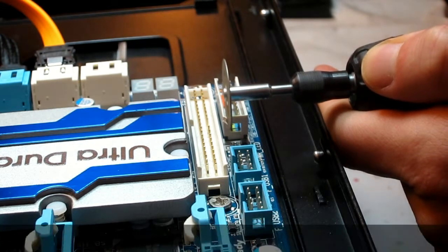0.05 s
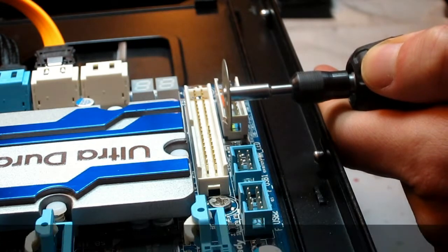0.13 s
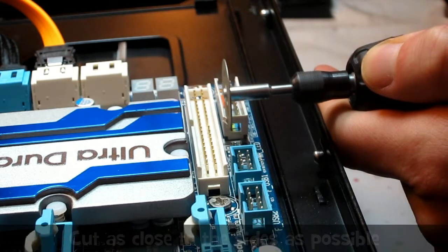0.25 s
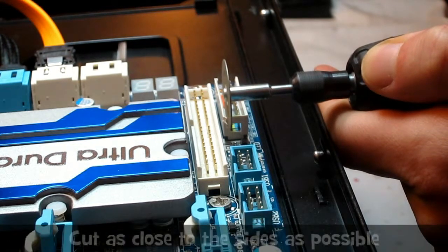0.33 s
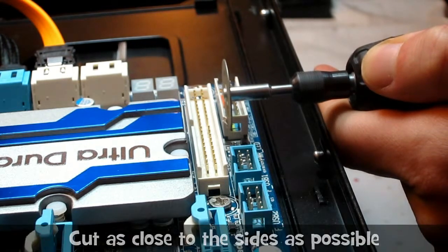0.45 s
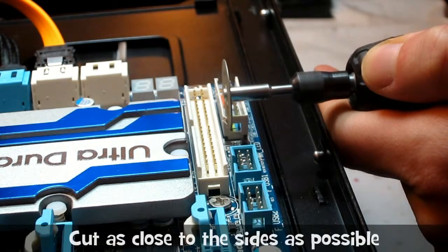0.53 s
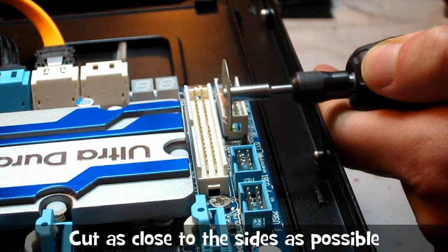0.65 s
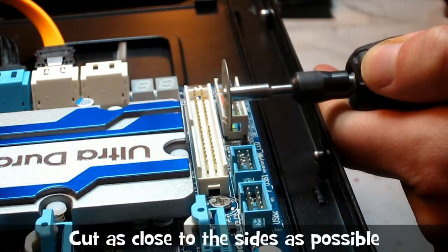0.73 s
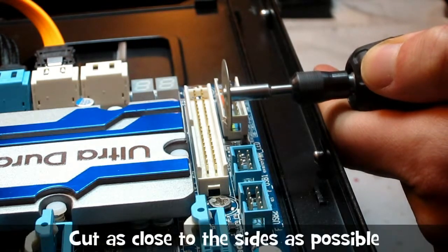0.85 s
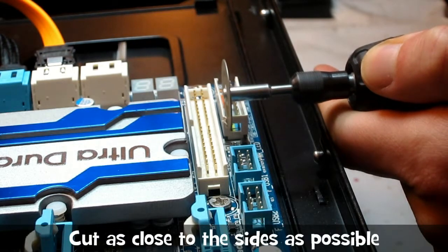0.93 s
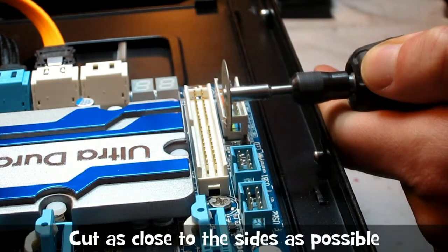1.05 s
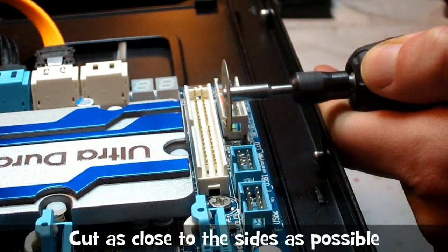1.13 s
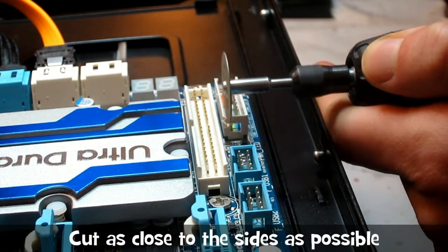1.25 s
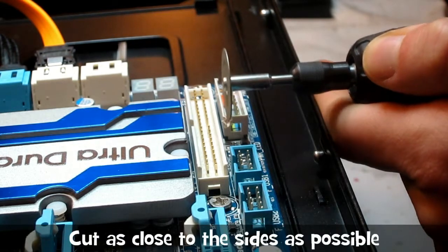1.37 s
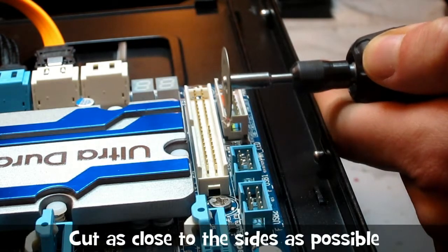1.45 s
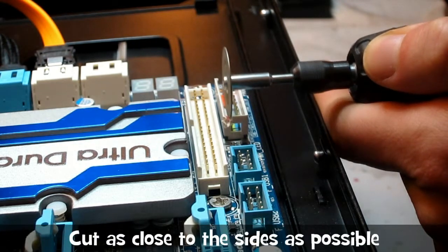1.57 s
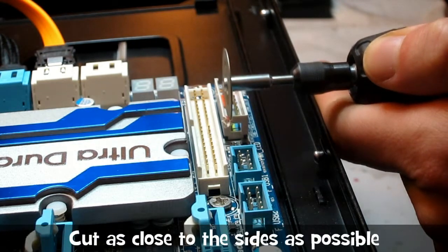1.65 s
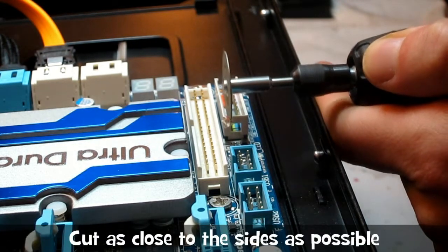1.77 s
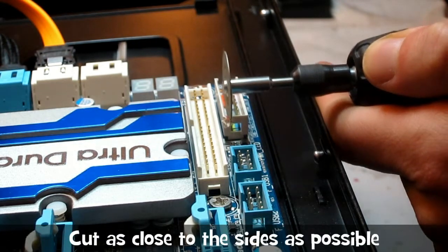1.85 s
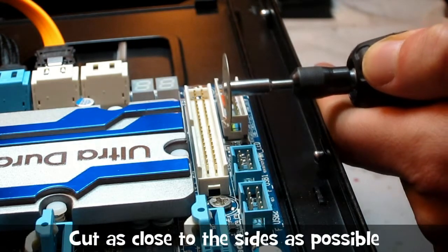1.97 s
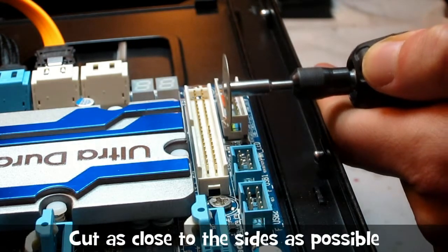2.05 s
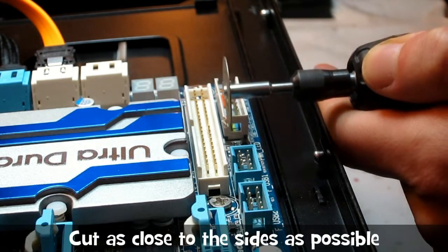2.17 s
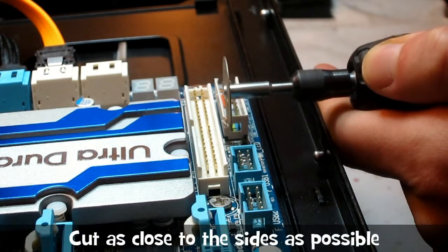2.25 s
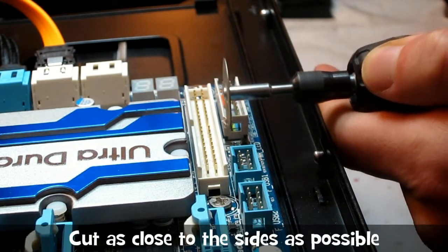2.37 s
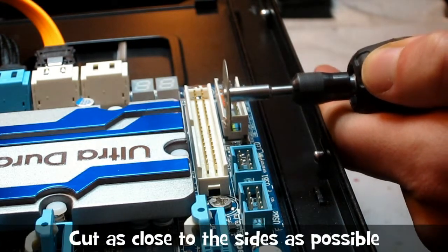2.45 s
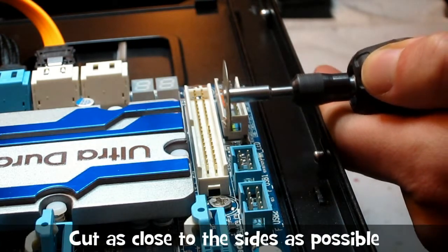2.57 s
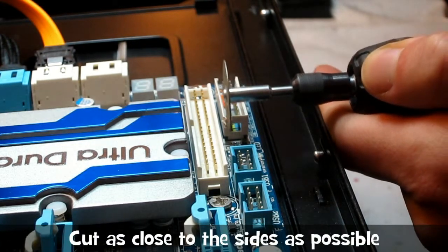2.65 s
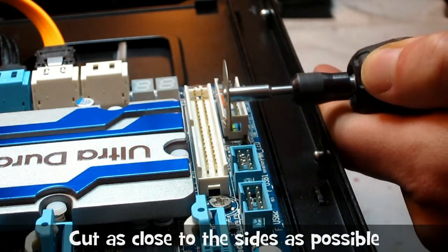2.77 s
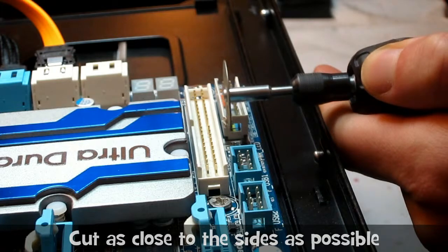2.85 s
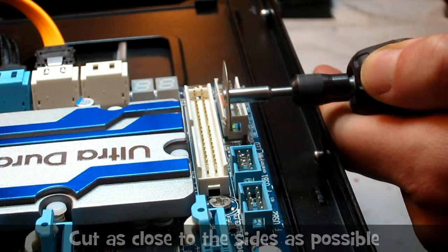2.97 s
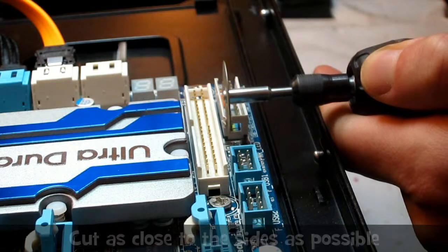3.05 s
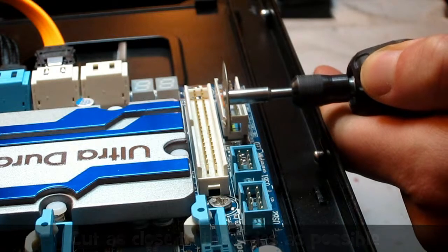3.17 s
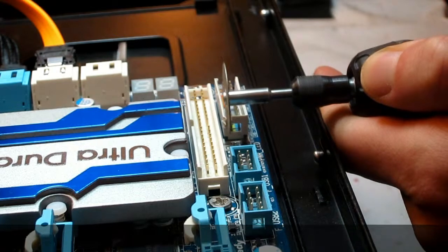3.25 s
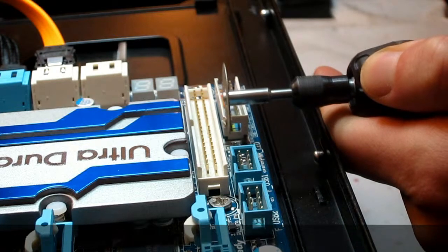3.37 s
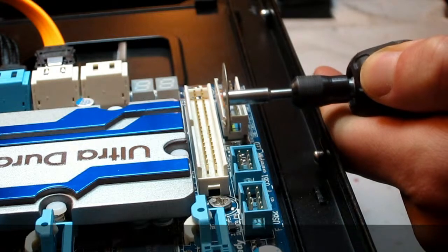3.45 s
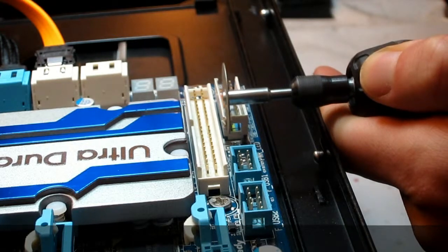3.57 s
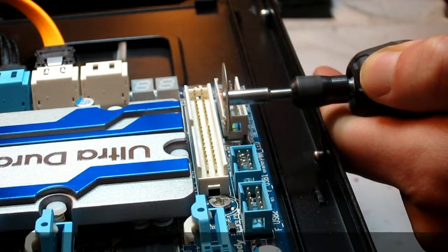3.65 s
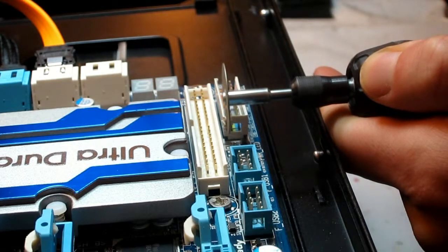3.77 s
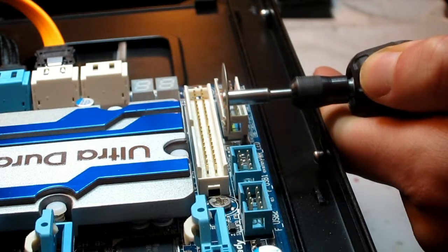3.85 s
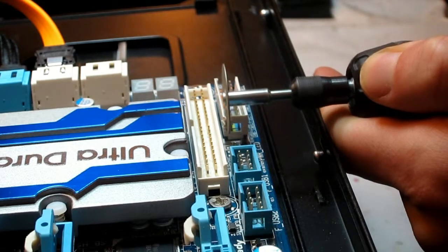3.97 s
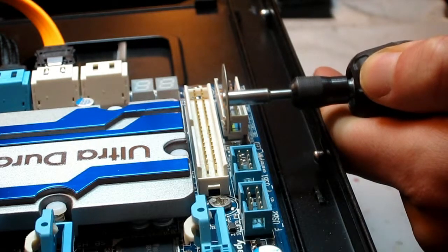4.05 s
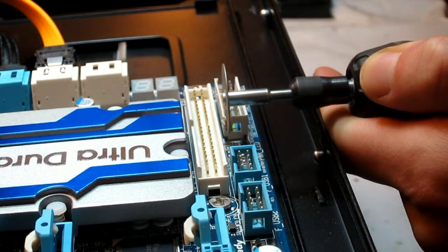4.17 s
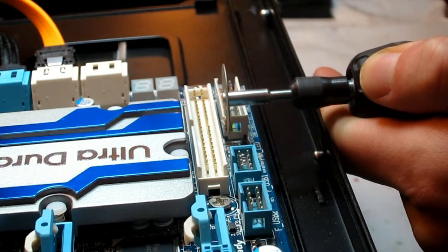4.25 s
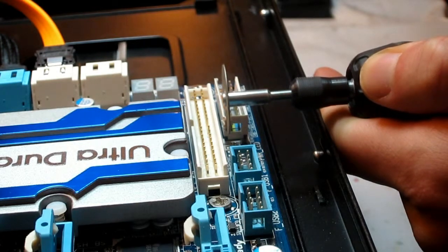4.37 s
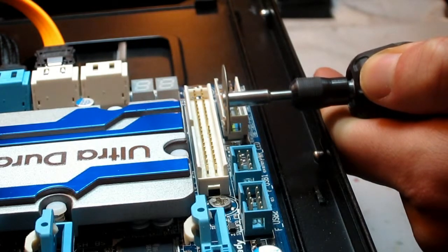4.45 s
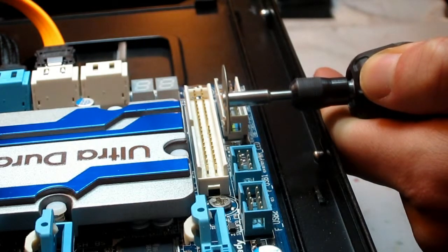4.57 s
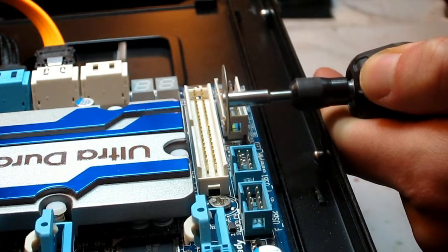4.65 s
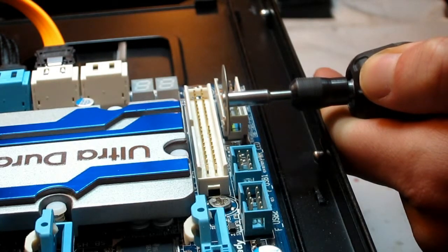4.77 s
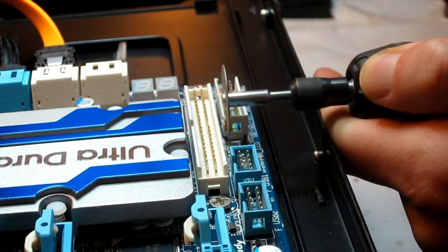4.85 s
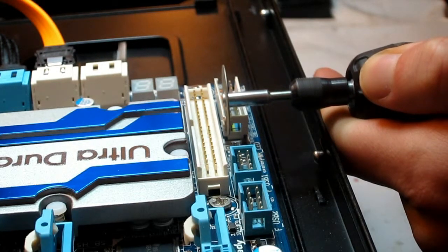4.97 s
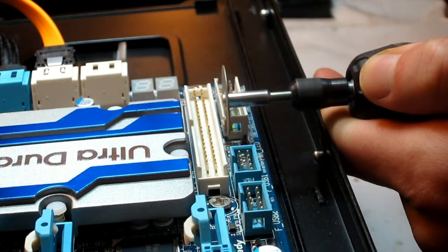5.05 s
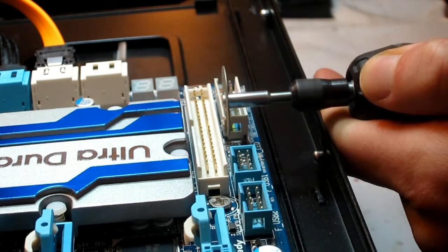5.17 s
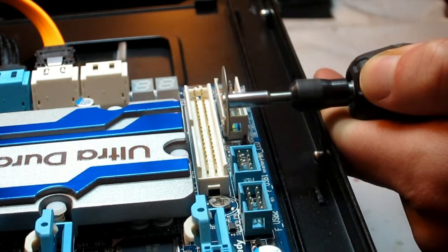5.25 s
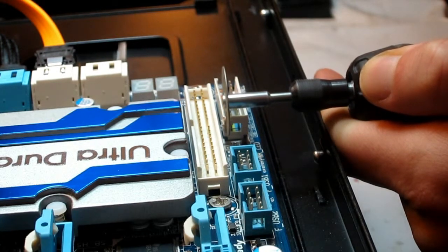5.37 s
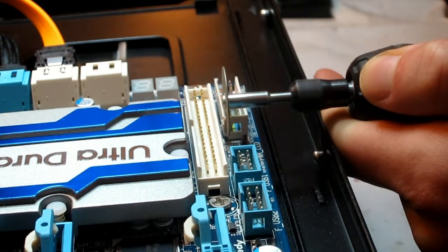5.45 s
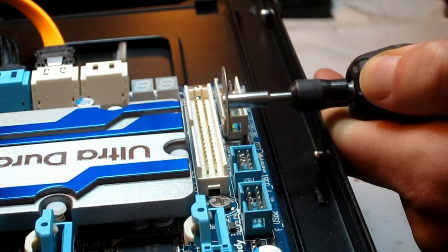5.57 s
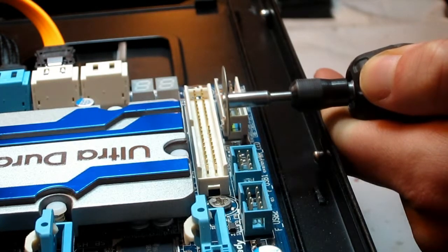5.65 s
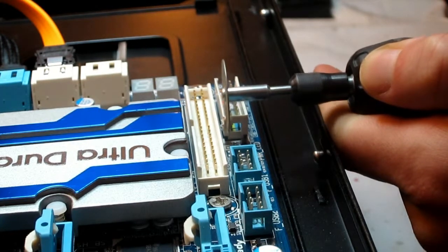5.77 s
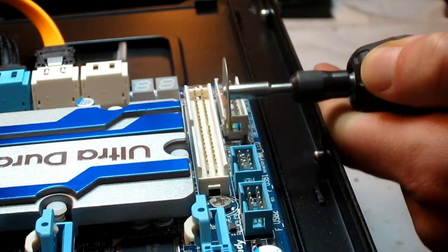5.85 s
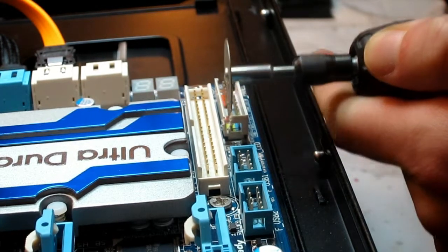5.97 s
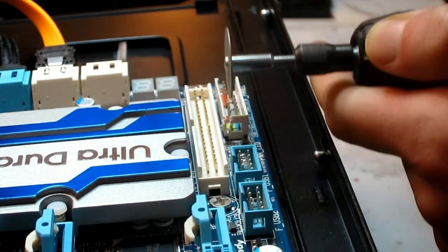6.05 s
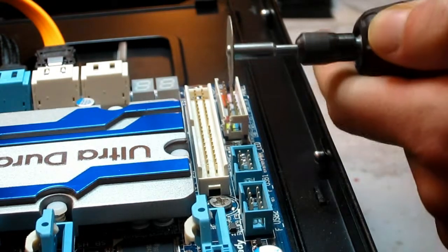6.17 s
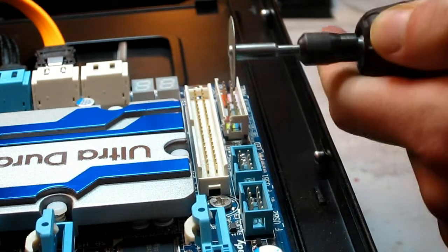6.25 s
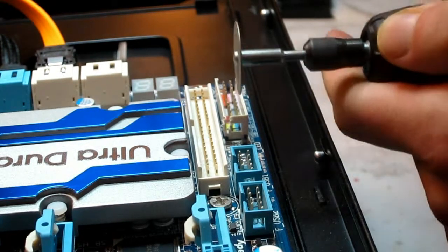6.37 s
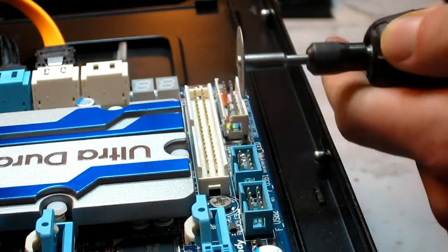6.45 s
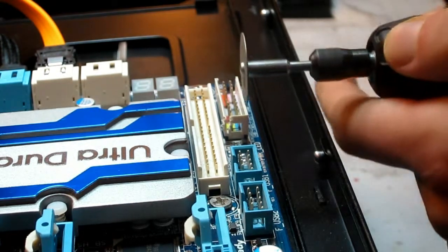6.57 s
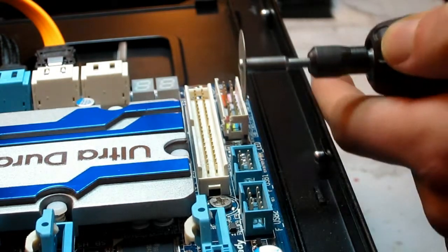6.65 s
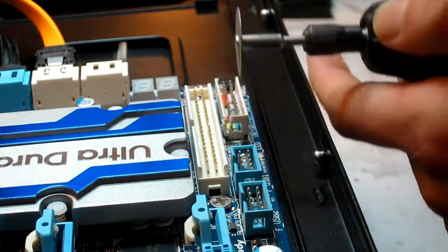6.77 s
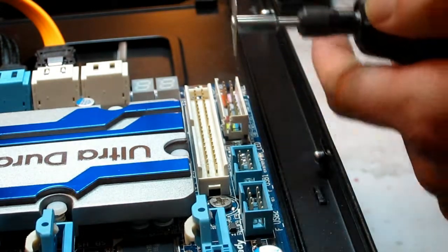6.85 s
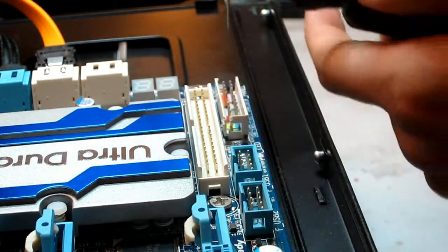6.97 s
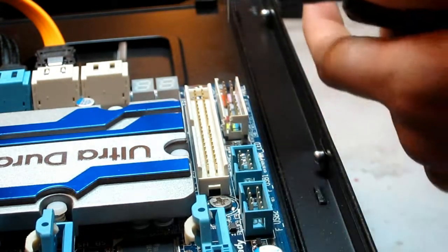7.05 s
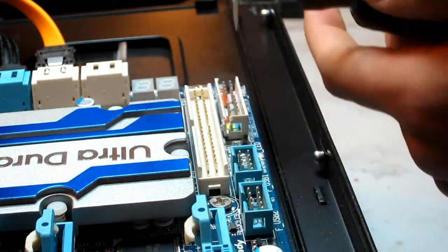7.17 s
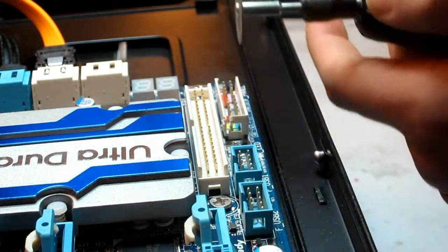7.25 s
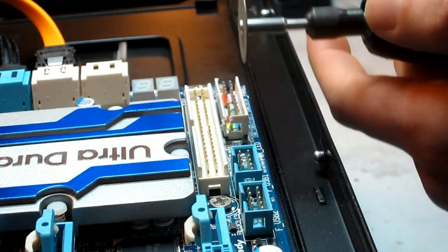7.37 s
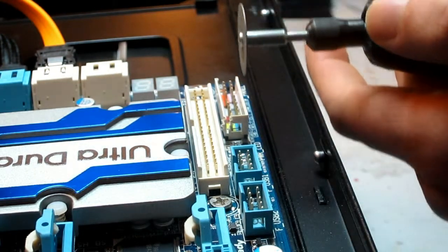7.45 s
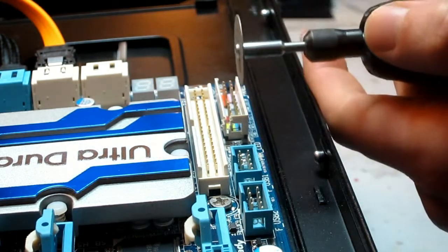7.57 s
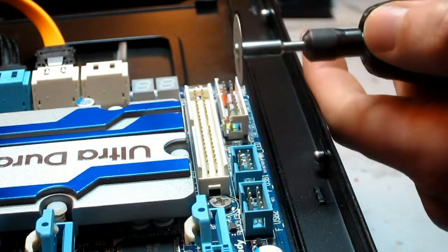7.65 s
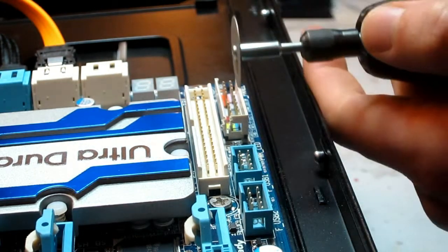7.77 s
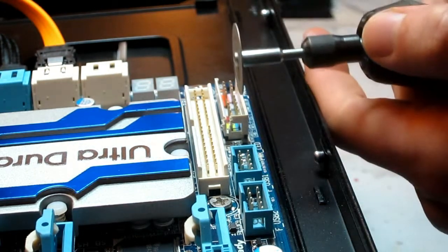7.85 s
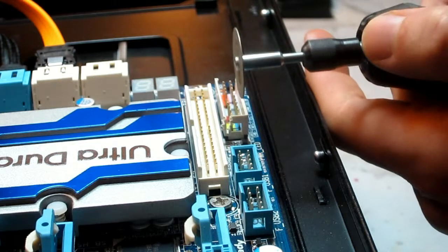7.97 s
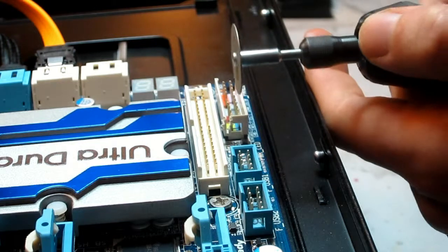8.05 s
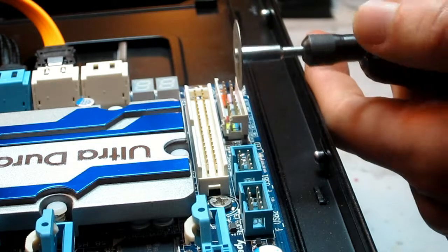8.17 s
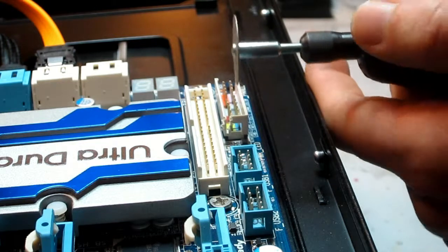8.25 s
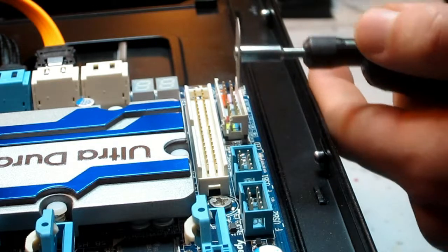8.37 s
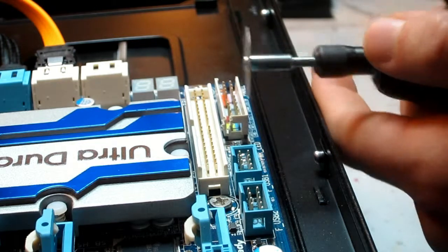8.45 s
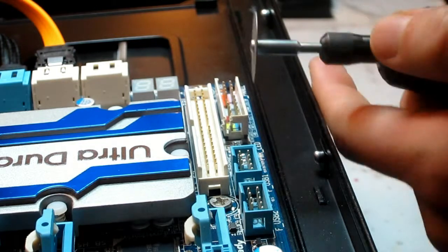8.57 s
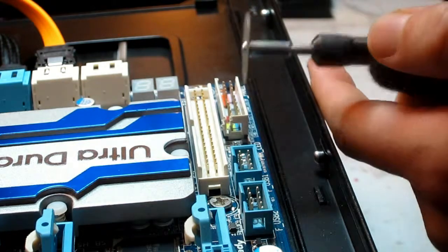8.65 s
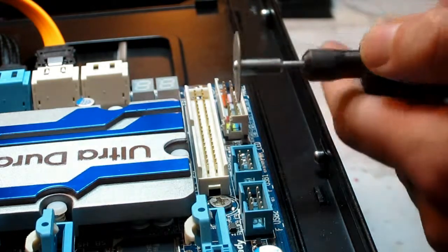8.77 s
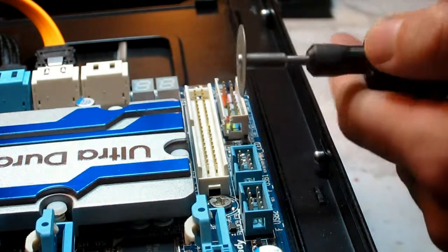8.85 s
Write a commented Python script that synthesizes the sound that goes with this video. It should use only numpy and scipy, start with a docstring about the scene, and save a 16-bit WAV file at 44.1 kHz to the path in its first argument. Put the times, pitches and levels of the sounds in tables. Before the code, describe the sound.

A handheld rotary tool is heard close up in a small, quiet room. It starts mid-cut, its thin disc grinding into a plastic connector with a shrill, gritty rasp, wavering squeal and fine hiss, while the circuit board buzzes underneath. At 1.3 seconds the disc lifts and the motor rises to a high whine with a fast ticking whirr. A few light scrapes come between 2 and 2.5 seconds. From 2.6 to 5.9 seconds a longer cut drags the motor down, its pitch wobbling under loud, pulsing grinding and squealing. After one last brief graze, the motor runs back up and spins freely, quieter than the cutting, with a steady whine, airy hiss and a thin whistle. Around 8 seconds a low rumble swells like air buffeting the microphone, peaking in a short hum at 8.4 seconds. The hiss briefly brightens and the tool keeps running until about 9 seconds.

```python
"""A handheld rotary tool with a thin cutting disc grinds into a plastic connector on a circuit board.
It opens mid-cut: the slightly eccentric disc bites once a turn, grit rings in disc and board, and the
board thuds along. At 1.3 s the disc lifts and the motor runs up, whining and ticking once a turn.
A few light touches lead into a second cut, which drags the motor down from 2.6 to 5.9 s. Then the tool
runs free, and a low rumble swells near the end."""
import sys
import numpy as np
from scipy import signal
from scipy.fft import rfft, irfft
from scipy.io import wavfile
from scipy.ndimage import uniform_filter1d

SR = 44100
rng = np.random.default_rng(int(sys.argv[2]) if len(sys.argv) > 2 else 0)


def store_pcm(level_fs):
    """Save levels as 16-bit WAV."""
    pcm = np.round(np.clip(level_fs, -1, 1) * 32767).astype(np.int16)
    wavfile.write(sys.argv[1], SR, np.atleast_2d(pcm).T)


N = 393372
TIME = np.arange(N) / SR
USUAL_GRIND_DB, USUAL_THUD_DB = -22, -45   # the contact levels of an ordinary cut


def amp(db):
    """Decibels to gain."""
    return 10 ** (np.asarray(db) / 20)


def rms_one(x):
    """Scale to unit rms."""
    return x / np.sqrt(np.mean(x ** 2) + 1e-20)


def in_time(rows):
    """Automation curves from rows that begin with a time: one curve a column, one value a sample."""
    seconds, *columns = np.transpose(rows)
    return np.array([np.interp(TIME, seconds, column) for column in columns])


def drift(rate_hz):
    """A smooth random wobble; rms 1."""
    r = np.exp(-40 * np.pi * rate_hz / SR)   # drawn every 20th sample
    slow = signal.lfilter([1], [1, -2 * r, r * r], rng.standard_normal(N // 20 + 2502))[2500:]
    return rms_one(np.interp(np.arange(N) / 20, np.arange(len(slow)), slow))


def colour(x, spectrum):
    """Shape by an EQ curve; rms 1."""
    hz, db = np.transpose(spectrum)
    grid = np.fft.rfftfreq(N, 1 / SR) + 1
    return rms_one(irfft(rfft(x) * amp(np.interp(np.log(grid), np.log(hz), db)), N))


def resonate(x, modes):
    """Parallel resonances with alternating signs; rms 1."""
    out = 0
    for k, (hz, width_hz, db) in enumerate(modes):
        r = np.exp(-np.pi * max(width_hz, 5) / SR)
        b = (1 - r * r) / 2 * np.array([1, 0, -1])
        a = [1, -2 * r * np.cos(2 * np.pi * hz / SR), r * r]
        out = out + (-1) ** k * amp(db) * signal.lfilter(b, a, x)
    return rms_one(out)


def wandering(x, hz, width_hz):
    """A steep resonance with a moving centre: shift down, smooth twice, shift back; rms 1."""
    spin = np.exp(2j * np.pi * np.cumsum(hz) / SR)
    r = np.exp(-np.pi * width_hz / SR)
    return rms_one((signal.lfilter([1], [1, -2 * r, r * r], x / spin) * spin).real)


def steadied(x, share):
    """Even out a share of the signal's swells and dips; rms 1."""
    swell = np.sqrt(uniform_filter1d(x ** 2, size=1800) + 1e-6)
    return rms_one(x / swell ** share)


def harmonics(turns, table, waver_db, rate_hz, steady=()):
    """Sines locked to the shaft; they waver in level, except the steady ones, which have set phases."""
    multiples, levels_db = np.transpose(table)
    holds = np.isin(multiples, steady)
    phases = np.where(holds, np.pi * multiples ** 2 / 2, rng.uniform(0, 2 * np.pi, len(table)))
    wobbles = [drift(rate_hz) for _ in range(5)]
    gains = [amp(db + waver_db * wobbles[k % 5] * ~holds[k]) for k, db in enumerate(levels_db)]
    return [gain * np.sqrt(2) * np.sin(2 * np.pi * multiple * turns + phase)
            for gain, multiple, phase in zip(gains, multiples, phases)]


def roughness(turns, memory, uneven_db=2, grains=400):
    """A ring of grains that comes round every turn and slowly wears into a new pattern; rms 1."""
    shape = (int(turns[-1]) + 2, grains)
    fresh = rng.standard_normal(shape) * amp(uneven_db * np.minimum(rng.exponential(1, shape), 4))
    worn = signal.lfilter([1], [1, -memory], fresh, axis=0).ravel()
    return rms_one(np.interp(turns * grains, np.arange(len(worn)), worn))


def room_tone():
    """Faint, dark room air, partly shared by left and right."""
    noise = rng.standard_normal((2, N)) + 1.17 * rng.standard_normal(N)
    return amp(-71.5) * signal.lfilter([1], [1, -.97], noise)


def reverb(x, t60_s=0.12, wet_db=-3.5):
    """The room: a short tail of decaying noise, thin in the bass, unrelated left and right."""
    t = np.arange(int(.3 * SR)) / SR
    tail = rng.standard_normal((2, len(t))) * amp(-60 * t / t60_s) * (t > .004)
    tail = signal.lfilter([1, -1], [1, -.85], tail)
    tail /= np.sqrt(np.sum(tail ** 2, axis=1, keepdims=True))
    return amp(wet_db) * signal.fftconvolve(x[None], tail, axes=1)[:, :N]


# The closing swell, and the round hum at its top. Each row: time in seconds, level in dB.
RUMBLE_SWELL = [(6.0, -61), (7.0, -57.5), (7.5, -55.5), (7.85, -52.5), (8.13, -41.5), (8.27, -40.5),
                (8.36, -38), (8.47, -44), (8.57, -41.5), (8.92, -48.5)]
HUM_SWELL = [(8.29, -52), (8.31, -39), (8.34, -32), (8.36, -26), (8.39, -25.5), (8.42, -37), (8.45, -59)]
# The rumble's boom. Each row: pitch in Hz, width in Hz, relative level in dB.
RUMBLE_MODES = [(178.5, 9.4, 6), (199, 35, -5), (89, 18, -19), (226, 30, -12.5), (60, 63, -31)]


def rumble(grind_db, cutting_db=-58, hum_hz=180.3):
    """A low, booming rumble near 180 Hz, like air buffeting the microphone, and one short hum."""
    level = amp(in_time(RUMBLE_SWELL)[0]) + amp(cutting_db + grind_db - USUAL_GRIND_DB)
    boom = steadied(resonate(rng.standard_normal(N), RUMBLE_MODES), share=0.32)
    humming = (TIME > HUM_SWELL[0][0]) & (TIME < HUM_SWELL[-1][0])
    hum = amp(in_time(HUM_SWELL)[0]) * humming * np.sin(2 * np.pi * hum_hz * TIME)
    return level * boom + hum


# The whistle comes and goes. Each row: time in seconds, gain in dB.
BEARING_FADER = [(5.9, 5), (6.9, 7), (7.3, 0), (7.7, -8), (8.2, -10), (8.35, 4), (8.6, -3), (8.92, -3)]


def bearing_whistle(hz=6820, width_hz=18, level_db=-54.5):
    """The bearing's thin whistle: noise in one very narrow resonance."""
    whistle = resonate(rng.standard_normal(N), [(hz, width_hz, 0)])
    return amp(level_db + in_time(BEARING_FADER)[0]) * whistle


# The flare's rise and fall. Each row: time in seconds, level in dB.
FLARE_SWELL = [(8.3, -70), (8.4, -56), (8.49, -48), (8.56, -43), (8.66, -59), (8.74, -72)]
# Its colour. Each row: centre in Hz, width in Hz, relative level in dB.
FLARE_BANDS = [(2100, 250, -1), (2600, 400, -3), (3950, 300, -4), (4630, 400, 2)]


def hiss_flare():
    """The tool's hiss brightens briefly near the end."""
    return amp(in_time(FLARE_SWELL)[0]) * resonate(rng.standard_normal(N), FLARE_BANDS)


# EQ of the cooling air and brushes. Each row: frequency in Hz, relative level in dB.
FAN_EQ = [(150, -32), (300, -28.5), (700, -19.5), (1070, -13.5), (1700, -20.5), (2300, -14), (3200, -17.5),
          (4500, -9.5), (5800, -20.5), (8000, -17), (10000, -26.5), (11200, -46), (13500, -24.5),
          (15500, -53)]


def fan_air(pulsing, level_db=-43):
    """Cooling air and brushes hiss, pulsing with the shaft."""
    return amp(level_db) * colour(pulsing * rng.standard_normal(N), FAN_EQ)


# Shaft speed under load, one list a cut. Each row: time in seconds, turn rate in Hz.
CUT_SPEEDS = [
    [(0.0, 97.0), (0.05, 98.2), (0.158, 93.9), (0.26, 97.4), (0.326, 103.7), (0.418, 99.9), (0.488, 106.7),
     (0.572, 112.2), (0.636, 109.9), (0.716, 111.1), (0.778, 102.4), (0.808, 100.2), (0.856, 93.5),
     (0.926, 92.8), (1.164, 100.4), (1.22, 105.5), (1.274, 98.9), (1.32, 105.0)],
    [(2.48, 133.2), (2.54, 130.9), (2.61, 130.9), (2.76, 115.4), (2.79, 106.8), (2.84, 102.9), (2.93, 90.5),
     (3.01, 88.9), (3.05, 89.8), (3.09, 87.7), (3.21, 89.0), (3.26, 97.6), (3.34, 96.7), (3.4, 98.9),
     (3.53, 91.0), (3.57, 92.2), (3.64, 86.0), (3.72, 88.6), (3.81, 89.0), (3.85, 86.7), (3.94, 86.8),
     (4.0, 89.9), (4.07, 90.5), (4.14, 88.0), (4.2, 91.3), (4.27, 92.3), (4.56, 92.0), (4.81, 88.2),
     (4.85, 89.4), (4.98, 86.4), (5.01, 88.3), (5.06, 87.6), (5.11, 89.8), (5.22, 89.4), (5.5, 85.2),
     (5.63, 92.7), (5.74, 94.8), (5.79, 86.7), (5.82, 85.9), (5.91, 104.2)],
]
FREE_HZ, FULL_LOAD_HZ = 133.17, 100


def motor_load(speed):
    """How far the motor is dragged down: 0 running free, 1 at full load."""
    return np.clip((FREE_HZ - speed) / (FREE_HZ - FULL_LOAD_HZ), 0, 1)


def shaft_speed(grab_hz=.55, run_up_s=.172, creep_hz_per_s=.4):
    """Turn rate in Hz: low and wavering as the disc grabs; off the work it runs up, then creeps on."""
    speed, = in_time(np.concatenate(CUT_SPEEDS))
    speed += grab_hz * motor_load(speed) * drift(11)
    for cut, until_s in zip(CUT_SPEEDS, [CUT_SPEEDS[1][0][0], N / SR]):
        lift_s = cut[-1][0]
        free = (TIME > lift_s) & (TIME < until_s)
        since = TIME[free] - lift_s
        sag_hz = FREE_HZ - speed[round(lift_s * SR)]
        speed[free] = FREE_HZ + creep_hz_per_s * since - sag_hz * np.exp(-since / run_up_s)
    return speed


# The tone shifts as the hand turns the tool. Each row: time in seconds, gains in dB for harmonic 8,
# harmonic 9, harmonics 15-21 and harmonics 22-25, tick level in dB, unloaded whirr level in dB,
# whirr centre in Hz.
HAND_MOVES = [(1.35, 1.5, -2, -3, -3, -44.5, -49, 4300), (1.65, 1.8, -6.5, 0, -6, -46, -43, 4200),
              (1.95, 1, -3, -6, -12, -43.5, -39, 4160), (2.47, 3.5, -8.5, -2, -7.5, -43.5, -42.5, 4270),
              (2.51, -4, -11, 3, -7.5, -48, -34, 4370), (2.62, 1, -2, 0, -7, -48, -43, 4270),
              (2.78, 2, 4, -5, -4, -44, -43, 4340), (3.0, 0, -4.5, -2.5, -2, -37, -54, 4280),
              (3.6, 4.5, -1, -1.5, -2, -43, -50, 4230), (4.3, 1, -1.5, -4, -10, -50.5, -49, 4330),
              (5.0, 3.5, -0.5, -2, 6, -29, -48, 4300), (5.55, 4, -0.5, 0, 1, -40, -47, 4260),
              (6.0, 1.5, -0.5, -2.5, -1, -47, -50, 4270), (6.3, 3.5, -6.5, 0, -10, -45, -43, 4350),
              (6.5, 2.5, -1, -5.5, -25, -43.5, -41.5, 4350), (6.75, 3.5, -7.5, 1, -17, -41, -45.5, 4500),
              (7.05, 0.5, -2.5, -4, -3, -40, -45.5, 4350), (7.4, 3, -9, -1.5, 1, -43, -42.5, 4430),
              (7.8, 3.5, -10, -3, -1.5, -42.5, -44, 4400), (8.3, 3.5, -8, -3, 0.5, -44.5, -41, 4490),
              (8.45, 4.5, -8, 0.5, -6, -41.5, -48, 4160), (8.52, 3.5, -9.5, 1, -7, -46, -43, 4530),
              (8.67, 0, -11, 1, 5, -45.5, -45, 4470), (8.75, -0.5, -10, 2, 2, -42.5, -57, 4220),
              (8.92, -0.5, -12, 2, -3, -39.5, -56, 4120)]
# The housing's ring at each tick. Each row: pitch in Hz, width in Hz, relative level in dB.
HOUSING_MODES = [(2670, 290, -7), (3730, 230, -8), (4570, 200, -13.5), (5260, 350, -10), (5890, 320, -5.5),
                 (7530, 350, -9)]


def motor_ticks(turns, load, pulsing, loaded_whirr_db=5, air_share=.06):
    """One tick a turn rings in the housing and, with rushing air, whirrs in the vent slots."""
    tick_db, whirr_db, whirr_hz = in_time(HAND_MOVES)[4:]
    angle = turns % 1 - .5
    strength = amp(0.5 * rng.standard_normal(int(turns[-1]) + 1))[turns.astype(int)]
    ticks = strength * np.exp(-(angle / 0.004) ** 2) + .02 * roughness(turns, memory=.96)
    housing = amp(tick_db) * resonate(ticks, HOUSING_MODES)
    rush = air_share * pulsing * rng.standard_normal(N)
    vents = wandering(rms_one(ticks) + rush, whirr_hz, width_hz=760)
    return housing + amp(whirr_db + loaded_whirr_db * load) * vents


def motor_noise(turns, load):
    """The motor's noisy side: ticks, whirr, air, bearing and the brief flare of hiss."""
    pulsing = 1 + 0.39 * np.cos(2 * np.pi * (turns % 1 - .58))   # the air swells once a turn
    return motor_ticks(turns, load, pulsing) + fan_air(pulsing) + bearing_whistle() + hiss_flare()


# The whine's recipe. Each row: multiple of the turn rate, base level in dB.
WHINE_HARMONICS = [(1, -1.5), (2, -27.5), (3, -27.5), (4, -24.5), (5, -17.5), (6, -14), (7, -11), (8, -3.5),
                   (9, 3), (10, -8.5), (11, -10), (12, -16.5), (13, -11.5), (14, -19), (15, -10),
                   (16, -12.5), (17, -6.5), (18, -15), (19, -39), (20, -7), (21, -6), (22, -13), (23, -18),
                   (24, -10), (25, -17.5)]
# Harmonics 8 and 9 sound through the housing. Each row: frequency in Hz, gain in dB.
HOUSING_EQ = [(680, -43), (720, -40.5), (775, -36), (810, -37.5), (850, -45), (900, -48), (960, -40.5),
              (1030, -41), (1070, -38.5), (1150, -40), (1200, -37.5)]
# Unbalance shakes the tool at the fundamental. Each row: turn rate in Hz, gain in dB.
UNBALANCE_SHAKE = [(85, -55), (90, -58.5), (93, -70), (98, -73), (103, -62.5), (112, -58), (120, -67),
                   (134, -61)]
# Harmonic 16 grows late on. Each row: time in seconds, gain in dB.
OCTAVE_FADER = [(2.5, 1), (6.6, 1), (7.0, 6), (7.4, 2), (7.8, 11.5), (8.1, 5), (8.4, 11), (8.52, 8),
                (8.65, 3), (8.92, 7)]
# One high harmonic sings out near the end. Each row: time in seconds, level in dB.
SING_SWELL = [(6.6, -59), (6.75, -63), (6.86, -40), (6.98, -60), (7.55, -42), (8.31, -41), (8.43, -50),
              (8.52, -39), (8.92, -62)]


def motor_whine(turns, speed, thud_db, loaded_db=-4.5, flutter_db=4.5, follows_thud=0.42, sing_harmonic=33):
    """Commutator whine locked to the shaft; under load it drops, flutters and follows the pressure."""
    eighth_db, ninth_db, upper_db, top_db = in_time(HAND_MOVES)[:4]
    eighth_db += np.interp(8 * speed, *np.transpose(HOUSING_EQ))
    ninth_db += np.interp(9 * speed, *np.transpose(HOUSING_EQ))
    shake_db = np.interp(speed, *np.transpose(UNBALANCE_SHAKE))
    tones = harmonics(turns, WHINE_HARMONICS, waver_db=2, rate_hz=1.18, steady=(7, 8, 9, 10))
    gains_db = np.tile((eighth_db + ninth_db) / 2, (len(tones), 1))   # the rest follow harmonics 8 and 9
    gains_db[[0, 7, 8]] = shake_db, eighth_db, ninth_db
    gains_db[14:21] += upper_db
    gains_db[21:] += top_db
    gains_db[15] += in_time(OCTAVE_FADER)[0]
    pressed_db = np.clip(thud_db - USUAL_THUD_DB, -20, 8) * (thud_db > -85)
    pressed_db = uniform_filter1d(pressed_db, size=2000)
    flutter = np.array([drift(14.7) for _ in range(3)])[np.arange(len(tones)) % 3]
    flutter[7:9] *= .3   # harmonics 8 and 9 flutter less
    gains_db[1:] += motor_load(speed) * (loaded_db + follows_thud * pressed_db + flutter_db * flutter[1:])
    singing = amp(in_time(SING_SWELL)[0]) * (TIME > SING_SWELL[0][0])
    return np.sum(amp(gains_db) * tones, axis=0) + singing * np.sin(2 * np.pi * sing_harmonic * turns)


# The two long cuts, one list each; the thud tells how hard the disc is pressed.
# Each row: time in seconds, grind fader in dB, thud fader in dB.
CUT_FADERS = [
    [(0.0, -15, -41.5), (0.05, -21, -55), (0.074, -21, -44.5), (0.132, -19.5, -45), (0.254, -21, -49),
     (0.326, -20, -67.5), (0.384, -16, -54), (0.502, -29, -62), (0.536, -17.5, -57), (0.548, -24, -63),
     (0.61, -18, -54), (0.662, -26, -59), (0.714, -18, -52.5), (0.832, -20, -38), (0.922, -22, -48),
     (1.018, -20.5, -39), (1.152, -18, -41.5), (1.214, -20.5, -55), (1.292, -23, -53), (1.31, -56.5, -76),
     (1.33, -40, -71)],
    [(2.57, -40.5, -50), (2.64, -17, -50), (2.68, -27, -42), (2.71, -33, -49), (2.74, -24, -37),
     (2.77, -20, -39), (2.83, -23, -46), (2.86, -17, -36), (2.96, -16.5, -38), (3.03, -18, -43),
     (3.08, -19, -37.5), (3.18, -23, -53), (3.24, -24, -51), (3.28, -17, -36.5), (3.31, -19.5, -39),
     (3.43, -19, -42), (3.56, -16.5, -50.5), (3.6, -18.5, -34), (3.68, -21, -49), (3.74, -20, -43),
     (3.82, -20, -53.5), (3.96, -19.5, -40.5), (3.99, -20, -47.5), (4.06, -19.5, -48), (4.16, -22.5, -50.5),
     (4.24, -17.5, -43), (4.49, -17.5, -43.5), (4.7, -23, -45), (5.12, -22, -46), (5.16, -23, -58),
     (5.2, -19, -41), (5.33, -23, -48), (5.46, -19.5, -43), (5.59, -23.5, -55), (5.63, -25.5, -55.5),
     (5.73, -26, -60), (5.75, -29.5, -56), (5.82, -29.5, -86), (5.87, -30, -55), (5.89, -64, -60)],
]
# Brief touches of the rim. Each row: start in seconds, hold in seconds, grind fader in dB,
# hiss gain on top of the grind in dB, fall in dB per second.
RIM_TOUCHES = [(1.994, 0.012, -48, 10.5, 500), (2.062, 0.051, -38, 1.5, 900),
               (2.337, 0.026, -33.5, 2.5, 397), (2.435, 0.046, -36.5, 0, 500),
               (2.481, 0.004, -16, -11, 900), (2.49, 0.04, -18.5, -6.5, 552), (5.942, 0.012, -18, 3, 1502)]
# The connector's ring as the slot deepens. Each row: time in seconds, gain on top of the grind in dB.
CONNECTOR_FADER = [(0.0, -6), (0.25, -5), (0.35, 4), (0.47, -3), (0.65, -4), (0.77, -4.5), (0.86, -1),
                   (1.0, -1.5), (1.15, -3.5), (1.24, -1), (1.3, -4), (2.6, -13), (2.8, -5), (2.9, -3),
                   (3.1, -4), (3.3, -5), (3.45, -3.5), (3.6, -0.5), (3.75, -3), (3.9, -6), (4.2, -3.5),
                   (4.5, -6.5), (4.8, -3), (4.9, -10), (5.3, -1.5), (5.5, -9.5), (5.9, -7.5)]


def contact(touch_rise_db_per_s=6000, touch_ring_db=-14.5):
    """Faders in dB as the disc meets the work; hiss, board and connector ride on top of the grind."""
    grind_db, thud_db = in_time(np.concatenate(CUT_FADERS))
    first, second = CUT_FADERS
    lifted = ((TIME > first[-1][0]) & (TIME < second[0][0])) | (TIME > second[-1][0])
    grind_db[lifted] = thud_db[lifted] = -90
    swing_db = np.clip(grind_db - USUAL_GRIND_DB, -6, 6)   # the three riders cancel most of this swing
    pressed_db = np.maximum(thud_db - USUAL_THUD_DB, -20)
    hiss_db = -3 - 0.81 * swing_db
    board_db = -5 + 0.66 * pressed_db - 0.89 * swing_db + 1.2 * drift(6)
    connector_db = in_time(CONNECTOR_FADER)[0] - 0.89 * swing_db + 1.5 * drift(8)
    for start, hold, peak_db, touch_hiss_db, fall in RIM_TOUCHES:
        attack_db = np.maximum(touch_rise_db_per_s * (start - TIME), 0)
        release_db = np.maximum(fall * (TIME - start - hold), 0)
        level_db = peak_db - attack_db - release_db
        on = level_db > grind_db
        grind_db[on], hiss_db[on] = level_db[on], touch_hiss_db
        board_db[on] = connector_db[on] = touch_ring_db
    return grind_db, hiss_db, board_db, connector_db, thud_db


# The disc's knock on the board. Each row: multiple of the turn rate, relative level in dB.
THUD_HARMONICS = [(1, -21), (2, -27), (3, -5), (4, -1.5), (5, -4.5), (6, 0), (7, -2.5), (8, -39), (9, 3),
                  (10, -2.5), (11, -2), (12, 2.5), (13, -1), (14, 3.5), (15, 2.5), (16, -5), (17, 4)]
# The board's low ring. Each row: pitch in Hz, width in Hz, relative level in dB.
BOARD_LOW_MODES = [(371.6, 27, 0.5), (567, 44, -1), (672, 24, 2.5), (1011, 48, 4.5), (1397, 146, -1.5)]


def board_thud(turns, grit):
    """The once-a-turn knock and a little grit shake the board's low modes."""
    knock = sum(harmonics(turns, THUD_HARMONICS, waver_db=3.5, rate_hz=22.5))
    return resonate(knock + .14 * grit, BOARD_LOW_MODES)


# The upper ring of the board, and of the connector.
# Each row: pitch in Hz, width in Hz, relative level in dB.
BOARD_HIGH_MODES = [(2410, 780, -14.5), (2710, 134, 5), (2850, 810, -8.5)]
CONNECTOR_MODES = [(3184, 94, 0), (3210, 100, 3), (3376, 110, -1.5), (3780, 160, -6), (3890, 190, -14)]


def workpiece_ring(grit, bite, board_db, connector_db):
    """Grit rings in board and connector; friction steadies both, and they quieten as the disc lifts."""
    board = amp(board_db) * steadied(resonate(grit, BOARD_HIGH_MODES), share=0.85)
    connector = amp(connector_db) * steadied(resonate(grit, CONNECTOR_MODES), share=1)
    return (board + connector) * bite ** 0.19


# EQ of the fine hiss. Each row: frequency in Hz, relative level in dB.
GRIT_EQ = [(5000, -43), (6500, -13), (8000, 4.5), (10700, -1.5), (11300, -55), (11900, 10), (14000, -10),
           (15300, 27), (15700, -19)]
# The thin rim's sizzle. Each row: pitch in Hz, width in Hz, relative level in dB.
RIM_MODES = [(7360, 450, -6), (9240, 59, -1.5), (9980, 500, -0.5), (12030, 1200, -14), (13570, 222, 10.5)]
# Two rings of the rim that stand out. Each row: pitch in Hz, width in Hz.
RIM_RINGS = [(7400, 260), (9500, 205)]
# Their balance against the hiss. Each row: time in seconds, lower ring in dB, upper ring in dB.
RIM_RING_FADERS = [(0.0, -15, -11), (1.3, -12, -10.5), (2.5, -18, -9), (2.9, -10, -14), (3.5, -9.5, -9),
                   (4.3, -8.5, -16), (5.0, -7, -12.5), (5.8, -9.5, -17)]


def grit_hiss(bite, grains):
    """Fine grit hisses and rings in the thin rim; flying chips differ left and right."""
    spray = bite * (grains + 0.51 * rng.standard_normal((2, N)) + 0.37 * rng.standard_normal(N))
    hiss = colour(resonate(spray, RIM_MODES) + 0.62 * spray, GRIT_EQ)
    for (hz, width_hz), db in zip(RIM_RINGS, in_time(RIM_RING_FADERS)):
        hiss += amp(db) * resonate(spray, [(hz, width_hz, 0)])
    return hiss


# The squeal wanders with the depth of cut. Each row: time in seconds, lower band in Hz,
# upper band in Hz, upper band fader in dB, share of each turn in contact.
SQUEAL_MOVES = [(0.05, 5080, 6270, -4, 0.76), (0.15, 5060, 5900, 3.5, 0.95), (0.25, 5000, 5760.0, -6, 0.63),
                (0.35, 5160, 5560, -8, 0.88), (0.45, 5020, 6060, 6, 0.36), (0.55, 5160, 5800, 11.5, 0.36),
                (0.65, 5200, 6000, 7.5, 0.67), (0.75, 5070, 5570, -2, 0.71), (0.85, 5020, 6200, 3.8, 0.99),
                (0.95, 5100, 6140, 5, 0.8), (1.05, 5030, 6000, 6, 0.67), (1.15, 5120, 5830, 2, 0.3),
                (1.25, 5010, 5900.0, 13, 0.6), (2.51, 5190, 5800, -5, 0.53), (2.63, 5130, 5500, 1.5, 0.56),
                (2.74, 5250, 5700, 11, 0.27), (2.85, 5250, 5610.0, 6, 0.43), (2.96, 5100, 5700, 3.5, 0.7),
                (3.07, 5130, 5400, 3, 0.63), (3.18, 5160, 5820, 14, 0.58), (3.29, 5200, 6000, -3, 0.39),
                (3.4, 5220, 5740, 13.5, 1), (3.51, 5120, 5800, -19, 0.87), (3.62, 5140, 5880, 8, 0.86),
                (3.73, 5070, 5760, 8, 0.8), (3.84, 5140, 5500, -5, 0.85), (3.95, 5100.0, 5940, 3, 0.87),
                (4.06, 5100.0, 5950, 3, 0.57), (4.17, 5070, 5900, 7.5, 0.68), (4.28, 5200, 5670, 4, 0.8),
                (4.39, 5100, 5680, -4, 0.98), (4.5, 5040, 6000, 5.5, 0.7), (4.61, 5140, 5820, 8.5, 0.72),
                (4.72, 5120, 5940, 9.5, 0.73), (4.83, 5200, 5870, 6, 0.76), (4.94, 5270, 5600, 1, 0.49),
                (5.05, 5180, 5600, 3, 0.54), (5.16, 5200, 5770, 8, 0.75), (5.27, 5160, 5560, 8, 0.53),
                (5.38, 5160.0, 5460, -11, 0.73), (5.49, 5190.0, 5660, 5, 0.66), (5.6, 5140, 6000, 3, 0.85),
                (5.71, 5080, 6200, 8, 0.72), (5.82, 5200, 5970, 7.5, 0.88), (5.96, 4970, 5900, 6, 0.26)]


def disc_squeal(grit, bite, width_hz=200, lower_lag_s=.002):
    """The clamped disc squeals in two bands that choke when it lifts; the lower answers a little late."""
    lower_hz, upper_hz, upper_db, _ = in_time(SQUEAL_MOVES)
    lower = steadied(wandering(grit, lower_hz + 10 * drift(5.8), width_hz), share=1)
    upper = steadied(wandering(grit, upper_hz + 50 * drift(4.8), width_hz), share=1)
    late_bite = np.roll(bite, round(lower_lag_s * SR))
    return late_bite ** 0.84 * lower + bite ** 0.95 * amp(upper_db - 7) * upper


def disc_bite(turns, speed, fresh_slot_db=15, slot_deepens_s=0.14):
    """The high side of the disc digs in sharply and eases out over each turn; an envelope near rms 1."""
    contact_share = np.clip(in_time(SQUEAL_MOVES)[-1], .2, .95)
    lift_db = np.interp(speed, [88, 130], [22, 29])   # a loaded, slow disc lifts less
    since = TIME - CUT_FADERS[1][0][0]   # it lifts further in the second cut's fresh slot
    lift_db += fresh_slot_db * (since > 0) * np.exp(-np.abs(since) / slot_deepens_s)
    angle = (turns + 0.035 * drift(5)) % 1
    ease = np.log(6 / lift_db) / np.log(contact_share)   # 6 dB down where contact ends
    bite = uniform_filter1d(amp(-lift_db * angle ** ease), size=30)
    return bite / np.sqrt(uniform_filter1d(bite ** 2, size=2000))


# The disc's own ring. Each row: pitch in Hz, width in Hz, relative level in dB.
DISC_MODES = [(4460, 103, -8), (4790, 105, -6), (5414, 150, 4), (5770, 640, 1), (6440, 35, -32)]
# EQ of the broad rub beneath it. Each row: frequency in Hz, relative level in dB.
RUB_EQ = [(180, -63), (300, -70), (355, -53), (798, 5.5), (1640, -1), (2710, 5.5), (4300, 12), (4800, 9.5),
          (5090, -36), (6500, 1.5), (8450, -37), (14300, -120)]


def cutting(turns, speed, grind_db, hiss_db, board_db, connector_db, thud_db):
    """Each bite drags the rim's grit through the work, sounding disc, workpiece and fine hiss."""
    bite = disc_bite(turns, speed)
    grains = roughness(turns, memory=0.92)
    grit = bite * (grains + 0.36 * rng.standard_normal(N))
    press = amp(grind_db + 1.42)
    disc = amp(-3.5) * disc_squeal(grit, bite)
    disc += amp(-5) * resonate(grit, DISC_MODES) + amp(-12) * colour(grit, RUB_EQ)
    hiss = amp(hiss_db) * grit_hiss(bite, grains)
    ring = workpiece_ring(grit, bite, board_db, connector_db)
    thud = amp(thud_db + 8) * board_thud(turns, grit)
    return press * disc, press * ring + thud, press * hiss


def delayed(x, samples):
    """Delay by a fractional number of samples."""
    return np.interp(np.arange(N) - samples, np.arange(N), x)


def place(x, echoes, pan_db, left_lag_samples=0):
    """Panned direct sound (positive is left) plus close echoes."""
    out = np.array([amp(pan_db / 2) * np.roll(x, left_lag_samples), amp(-pan_db / 2) * x])
    for left_ms, right_ms, left_db, right_db in echoes:
        out[0] += amp(left_db) * delayed(x, left_ms * SR / 1000)
        out[1] += amp(right_db) * delayed(x, right_ms * SR / 1000)
    return out


# Early reflections off nearby surfaces, for the tool and for the workpiece.
# Each row: left delay in ms, right delay in ms, left gain in dB, right gain in dB.
TOOL_ECHOES = [(.35, 0.6, -51, -31), (1.3, 0.93, -20, -29)]
WORK_ECHOES = [(0.13, 0.2, -12.5, -11.5), (0.752, 1.065, -44, -17.5), (2.299, 1.867, -19.5, -14)]
# The motor is louder when the tool is closer. Each row: time in seconds, gain in dB.
TOOL_NEARNESS = [(2.5, 5), (6.2, 0.5), (6.9, 0.8), (8.2, 2), (8.92, 0)]


def scene():
    """The mix: motor to the right, disc to the left, workpiece and rumble around the middle."""
    speed = shaft_speed()
    turns = np.cumsum(speed) / SR
    grind_db, hiss_db, board_db, connector_db, thud_db = contact()
    nearness = amp(in_time(TOOL_NEARNESS)[0])
    whine = nearness * motor_whine(turns, speed, thud_db)
    whirr = nearness * motor_noise(turns, motor_load(speed))
    disc, workpiece, hiss = cutting(turns, speed, grind_db, hiss_db, board_db, connector_db, thud_db)
    near = place(whine + whirr, TOOL_ECHOES, pan_db=-3.5, left_lag_samples=2)
    near += place(disc, WORK_ECHOES, pan_db=4.5) + place(workpiece, WORK_ECHOES, pan_db=-1)
    near += np.array([amp(2.5) * delayed(hiss[0], samples=.6), hiss[1]])
    send = amp(-15.5) * whine + amp(-0.5) * whirr + disc + workpiece + hiss[1]   # the whine is mostly direct
    return near + room_tone() + reverb(send) + rumble(grind_db)


def gain_control(x, target_db=-17, max_gain_db=8.5, recovery_db_per_s=3, attack_s=0.036):
    """Loud sound pulls the gain down fast; it climbs back slowly."""
    size = round(attack_s * SR)
    power = uniform_filter1d(np.mean(x ** 2, axis=0), size=size, origin=(size - 1) // 2)
    level_db = 10 * np.log10(power + 1e-12)
    level_db[0] = level_db[:SR].max()   # the cut is already under way
    climb_db = recovery_db_per_s * TIME
    held_db = np.maximum.accumulate(level_db + climb_db) - climb_db
    return x * amp(np.minimum(target_db - held_db, max_gain_db))


def record(dry, low_cut_hz=60, high_cut_hz=16000):
    """Bass rolls off, the gain rides the level, the top is cut."""
    thin = signal.sosfilt(signal.butter(2, low_cut_hz, "high", fs=SR, output="sos"), dry)
    return signal.sosfilt(signal.cheby2(12, 70, high_cut_hz, fs=SR, output="sos"), gain_control(thin))


dry = scene()
out = record(dry)
store_pcm(out)
```